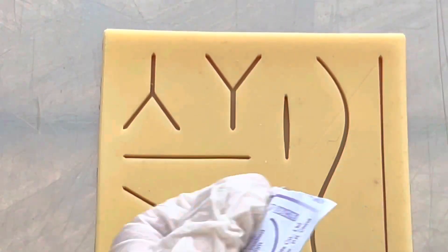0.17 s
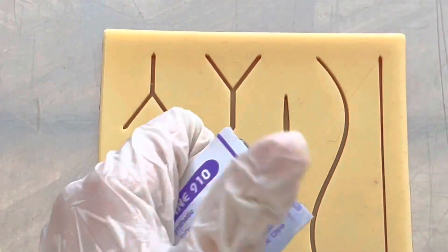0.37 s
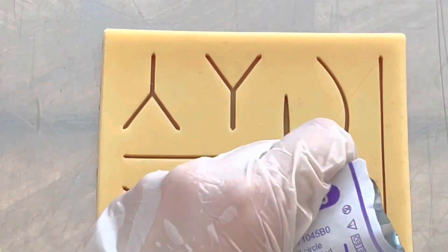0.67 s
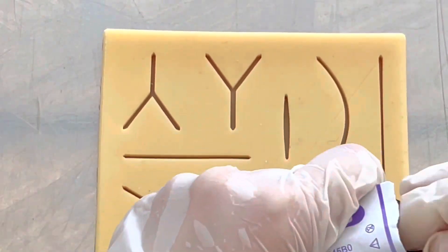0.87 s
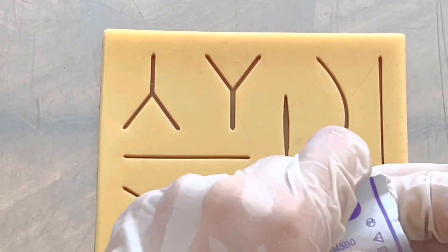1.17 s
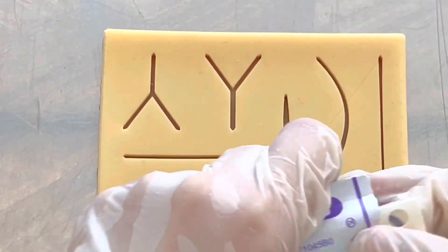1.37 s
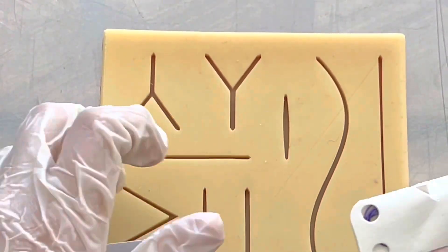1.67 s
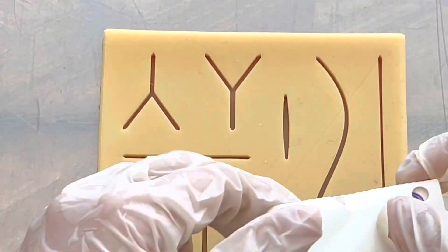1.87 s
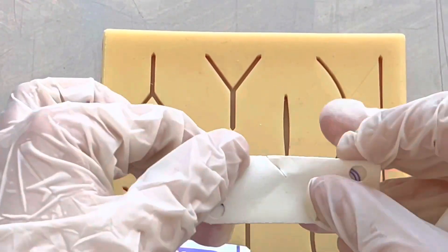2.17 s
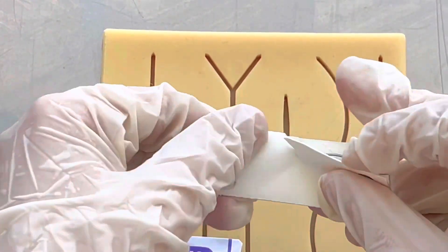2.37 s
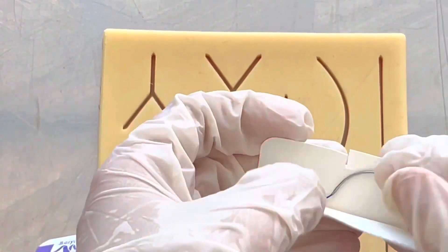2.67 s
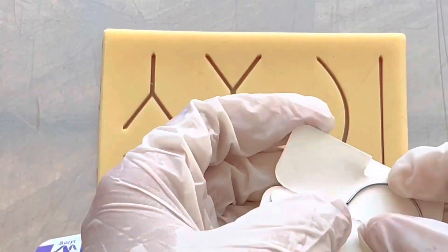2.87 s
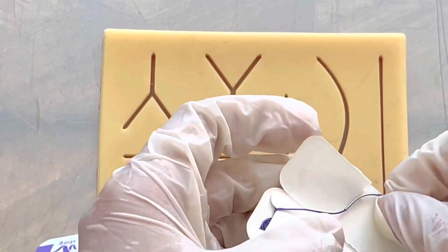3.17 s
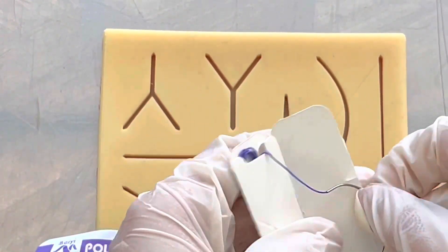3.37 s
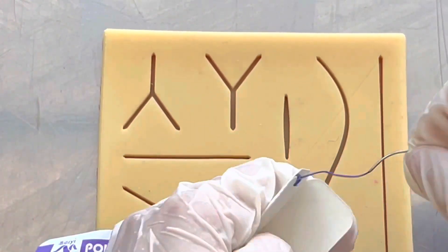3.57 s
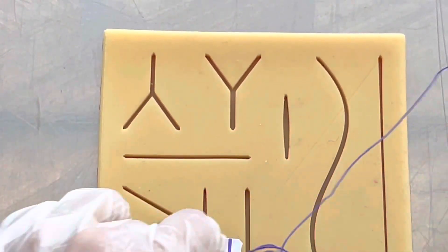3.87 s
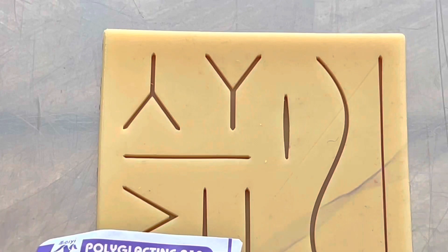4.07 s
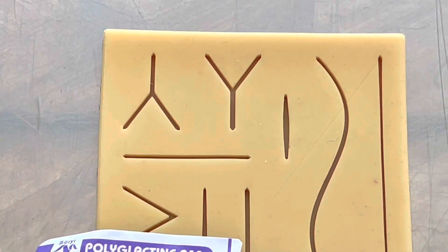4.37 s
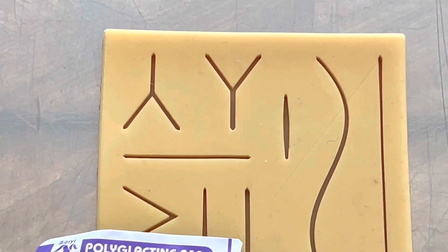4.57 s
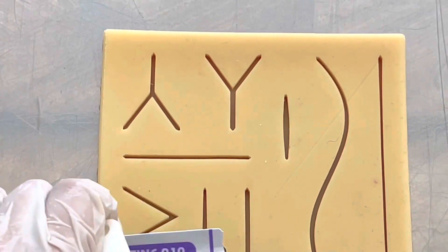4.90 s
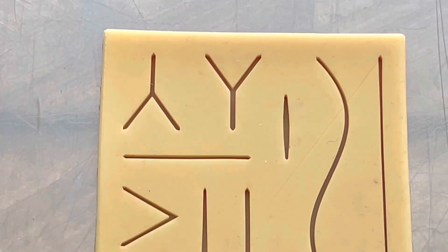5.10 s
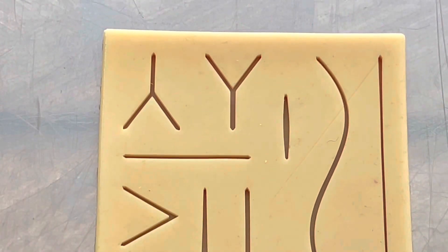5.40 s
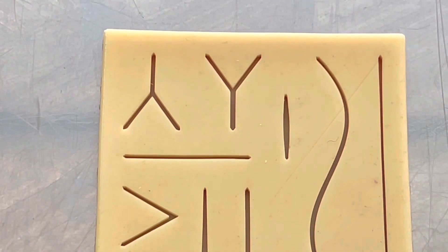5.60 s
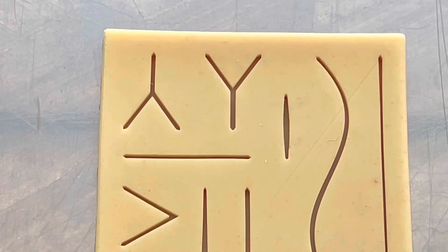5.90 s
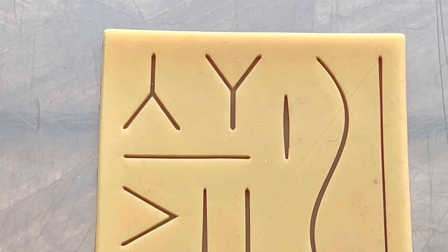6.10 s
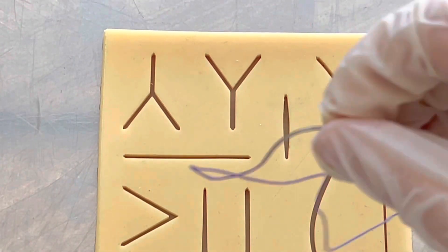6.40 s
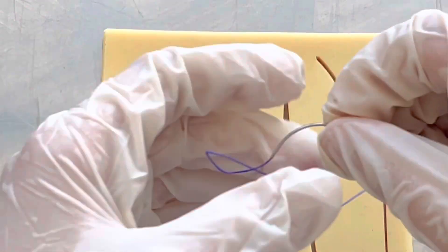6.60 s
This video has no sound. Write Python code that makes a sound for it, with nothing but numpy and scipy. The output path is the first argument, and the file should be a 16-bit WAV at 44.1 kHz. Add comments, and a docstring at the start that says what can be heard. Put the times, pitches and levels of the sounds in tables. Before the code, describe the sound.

A close stereo pickup in a small room with a low rush of air and faint, wavering machine hum. At once, foil tears in a dense crackly burst until about 0.15 s, then soft glove rustle. Crisp ringing snaps return around 0.6-0.75 s, with the sharpest near 1.0 s and another at 1.35 s beside short rubs. Lighter ticks lead to stiff card popping strongly at 2.12-2.27 s, with a dull soft bump. From 2.4 to 3.4 s there is mostly quiet rustling and small clicks. Between 3.4 and 4.25 s, quick dry rubs and swishes accompany the thread being drawn out. A brief lull near 4.7 s gives way to wrapper crinkles at 4.8-5.4 s, then a rough scraping skid peaking at 5.64 s and dulling away by about 6 s, with low soft bumps. Near quiet follows, then faint glove rustle around 6.4 s and a last soft bump near 6.7 s.

```python
"""Opening a foil suture packet

Gloved hands tear open a foil packet above a table, unfold the card inside and draw out the thread.
Stiff foil and card buckle in short ringing snaps, over stick-slip rubs and soft glove rustle (shaped noise);
the empty wrapper then slides away in three pushes, and the table answers soft bumps with low decaying sines.
A small room adds a noisy tail, moving air and machine hum; two closely spaced microphone ports pick it up."""
import sys
import numpy as np
from scipy import signal
from scipy.fft import rfft, irfft, next_fast_len
from scipy.io import wavfile
from scipy.ndimage import uniform_filter1d

SR = 44100
rng = np.random.default_rng(int(sys.argv[2]) if len(sys.argv) > 2 else 0)


def wrap_up_sound(samples):
    """Save the sound to the file named by the first command line argument, as 16-bit audio."""
    columns = np.atleast_2d(samples).T
    # keep every value between -1 and 1, then stretch to whole-number steps
    tamed = np.clip(columns, -1, 1)
    steps = np.round(tamed * 32767).astype(np.int16)
    wavfile.write(sys.argv[1], SR, steps)


N = 297479
SIZE = next_fast_len(N + 2048, True)
FREQS = np.fft.rfftfreq(SIZE, 1 / SR)
TIME = np.arange(N) / SR


def amp(db):
    """Decibels to gain."""
    return 10 ** (np.asarray(db) / 20)


def unit(x):
    """Scales to an rms of 1."""
    return x / np.sqrt(np.mean(x ** 2) + 1e-20)


def read(points, hz):
    """Reads a table on a log-frequency axis."""
    f, value = np.transpose(points)
    return np.interp(np.log(hz + 1), np.log(np.abs(f) + 1), value)


def add(mix, s, sound):
    """Adds a sound into the mix at a time in seconds."""
    part = mix[..., max(round(s * SR), 0):][..., :sound.shape[-1]]
    part += sound[..., :part.shape[-1]]


def filtered(x, gain):
    """Filters a full-length signal by a gain curve over FREQS."""
    return irfft(rfft(x, SIZE) * gain, SIZE)[..., :N]


def colour(x, db):
    """Filters a full-length signal by a dB curve over FREQS."""
    return filtered(x, amp(db))


def low_pass(x, hz):
    """Keeps what lies below a frequency."""
    return filtered(x, 1 / (1 + (FREQS / hz) ** 4))


def causal(gain, size=2048):
    """Minimum-phase impulse response: the quickest one with this magnitude."""
    log_gain = np.log(np.maximum(np.r_[gain, gain[-2:0:-1]], 1e-5))
    return np.fft.ifft(np.exp(np.conj(signal.hilbert(log_gain)))).real[:size]


def wander(rate_hz):
    """Slow random drift with an rms of 1."""
    return unit(low_pass(rng.standard_normal(N), rate_hz))


# likeness of diffuse sound at the two ports: [f/Hz, correlation]
PORT_CORRELATION = [(40, 0.96), (200, 0.85), (400, 0.46), (650, 0.088), (1000, 0.37), (1450, -0.54),
                    (1850, 0.65), (2300, 0.97), (4800, 1), (6000, 0.74), (8400, 1), (15000, 0.91)]


def diffuse(pair):
    """Makes two unrelated signals as alike as diffuse sound is at the ports."""
    c = np.clip(read(PORT_CORRELATION, FREQS), -1, 1)
    mid, side = filtered(pair, np.sqrt(np.array([1 + c, 1 - c]) / 2))
    return np.array([mid + side, mid - side])


def friction(slips_per_s, spread_db, hiss, uneven_db):
    """Tiny slips at random moments, each of random size and about a millisecond of noise, over a smooth hiss."""
    decay_s = 0.00081
    sizes = amp(spread_db * np.minimum(rng.exponential(1, N), 3.5))
    slips = (rng.random(N) < slips_per_s / SR) * sizes
    power = signal.lfilter([1], [1, -np.exp(-1 / (decay_s * SR))], slips ** 2)
    envelope = np.sqrt(power / power.mean() + hiss) * amp(uneven_db * wander(57))
    return unit(rng.standard_normal((2, N)) * envelope)


def patchy(x, depth_db, patch_s, patch_hz):
    """The contact point keeps moving, so different parts of the sheet sound from moment to moment."""
    hz, t, z = signal.stft(x, SR, nperseg=512, noverlap=384)
    across = np.fft.fftfreq(len(hz), hz[1])[:, None] * patch_hz
    along = np.fft.fftfreq(len(t), t[1]) * patch_s
    spectrum = np.fft.fft2(rng.standard_normal(z.shape[1:]))
    field = unit(np.fft.ifft2(spectrum * np.exp(-2 * (across ** 2 + along ** 2))).real)
    z = z * amp(depth_db * np.clip(field, -2, 2))
    return unit(signal.istft(z, SR, nperseg=512, noverlap=384)[1][:, :N])


def snap(ring_hz, ring_db, ring_width_hz, body_hz, body_db, treble_db):
    """A facet flips over in about two milliseconds; it and the sheet around it ring for a few cycles."""
    rise_s, evenness = 0.00041, 0.63  # evenness: how far the burst's spectrum is flattened, 0 to 1
    skirt_hz, body_width_hz = 1700, 650
    hz, t = np.fft.rfftfreq(2048, 1 / SR), np.arange(2048) / SR
    flip = rfft(rng.standard_normal(len(t)) * (t / rise_s) ** 2 * np.exp(-t / rise_s))
    flip /= np.sqrt(uniform_filter1d(abs(flip) ** 2, size=25)) ** evenness
    sheet_db = read([(150, body_db - 22.5), (600, body_db - 6.5), (1700, body_db), (2500, -0.88), (5800, -1.3),
                     (8000, treble_db - 0.5), (12000, treble_db), (16000, treble_db - 14.5)], hz)
    ring = amp(ring_db + 4.0) / np.hypot(1, 2 * (hz - ring_hz) / ring_width_hz)
    ring *= np.exp(-((hz - ring_hz) / skirt_hz) ** 2)
    body = amp(body_db + 5.0) / (1 + (2 * (hz - body_hz) / body_width_hz) ** 2)
    sound = rfft(causal(np.sqrt(amp(sheet_db) ** 2 + ring ** 2 + body ** 2))) * flip
    core = (hz > 2000) & (hz < 6000)  # band that sets the strength
    return irfft(sound / np.sqrt(np.mean(abs(sound[core]) ** 2)))[:len(t) // 2]


def creases(per_s, spread_db, count=10):
    """Small creases give way at random moments, each ticking at one of ten pitches."""
    sizes = (rng.random(N) < per_s / SR) * amp(spread_db * np.minimum(rng.exponential(1, N), 3))
    crease, ticks = rng.integers(0, count, N), np.zeros(N)
    for k, hz in enumerate(np.geomspace(2200, 6500, count)):
        tick = snap(hz, ring_db=10, ring_width_hz=900, body_hz=1300, body_db=-12, treble_db=-9)
        for at in np.flatnonzero(sizes * (crease == k)):
            add(ticks, at / SR, sizes[at] * tick)
    return unit(ticks)


# colour of the moving air: [f/Hz, relative level/dB]
AIR_COLOUR = [(20, -49.5), (28, -19.5), (36, 1), (60, 1.5), (95, -5.5), (140, 0.5), (220, -14),
              (350, -10.5), (500, -13.5), (750, -28.5), (1100, -33.5), (1600, -31.5), (2200, -40.5),
              (2750, -24.5), (3400, -54.5), (16000, -48)]
# steady lines of the machine: [f/Hz, relative level/dB]
HUM_LINES = [(37.7, -61.5), (123.8, -64.5), (150.7, -62), (188.4, -62.5), (226.1, -70.5), (263.8, -63.5),
             (301.5, -66), (339.1, -71), (414.5, -71.5), (468.3, -72.5), (490.3, -70), (619.1, -77.5)]


def background(air_db=-52, hum_db=-1, waver_rad=0.5):
    """Low rush of moving air and the wavering lines of a machine."""
    air = unit(colour(diffuse(rng.standard_normal((2, N))), read(AIR_COLOUR, FREQS)))
    hum = np.zeros(N)
    for hz, db in HUM_LINES:
        phase = 2 * np.pi * (hz * TIME + rng.random()) + waver_rad * wander(6.0)
        hum += amp(db) * np.sqrt(2) * np.sin(phase)
    return amp(air_db) * air + amp(hum_db) * hum


# room decay: [f/Hz, t60/s]
ROOM_DECAY = [(300, 0.64), (1600, 0.41), (4000, 0.51), (8000, 0.27), (15000, 0.31)]
# colour of the room's answer: [f/Hz, gain/dB]
ROOM_GAIN = [(200, 12.5), (600, 2.5), (1100, 3.5), (1700, 6), (2800, -4), (4200, -4.5), (7000, -2),
             (14000, -3)]


def room(x, build_s=0.001):
    """A noisy tail that decays at its own rate in each band, fastest in the treble."""
    hz, t, z = signal.stft(rng.standard_normal((2, SR * 3 // 4)), SR, nperseg=256)
    tail = signal.istft(z * amp(-60 * t / read(ROOM_DECAY, hz)[:, None]), SR, nperseg=256)[1]
    tail = tail * (1 - np.exp(-(np.arange(tail.shape[1]) / SR / build_s) ** 2))
    wet = signal.fftconvolve(x[None], tail / np.linalg.norm(tail[0]), axes=1)[:, :N]
    return diffuse(colour(wet, read(ROOM_GAIN, FREQS)))


# soft bumps of the hands on the table: [t/s, level/dB, f/Hz]
TABLE_BUMPS = [(2.276, -39, 62), (5.544, -44.5, 86), (5.641, -43, 64), (5.968, -39.5, 59),
               (6.689, -43.5, 170)]


def bumps(swell_s=0.013):
    """The table answers each soft push with a few low cycles."""
    out, t = np.zeros(N), np.arange(SR // 4) / SR
    for s, db, hz in TABLE_BUMPS:
        swell = t / swell_s * np.exp(1 - t / swell_s)
        add(out, s, amp(db) * swell * np.sin(2 * np.pi * hz * t))
    return out


# steady rustle, hushed when the hands rest: [t/s, level/dB]
HANDLING_LEVEL = [(0, -75), (0.45, -68.5), (0.72, -64), (1.08, -63.5), (1.33, -66.5), (1.85, -70),
                  (2.4, -60.5), (2.7, -67), (3.3, -63.5), (3.9, -66), (4.43, -69.5), (4.68, -80.5),
                  (4.84, -62), (5.4, -62), (6.1, -72), (6.22, -92.5), (6.47, -71.5), (6.75, -80.5)]
# separate rustles as the fingers shift their grip: [peak t/s, length/s, level/dB]
GRIP_CHANGES = [(0.01, 0.082, -50.5), (0.291, 0.18, -60.5), (0.518, 0.067, -59.5), (1.501, 0.08, -56.5),
                (1.944, 0.1, -56), (2.53, 0.11, -59.5), (2.841, 0.037, -60), (2.94, 0.047, -60.5),
                (3.095, 0.15, -61), (3.626, 0.098, -59), (4.328, 0.046, -62.5), (4.58, 0.049, -63),
                (4.927, .06, -61), (5.056, 0.062, -52.5), (5.21, .1, -60), (6.387, 0.096, -66.5)]
REGRIP_EDGE_DB = -8.5  # either end of a rustle, re its middle


def hand_motion():
    """Gain of the glove rustle: steady handling, plus a bell-shaped swell for each change of grip."""
    power = amp(np.interp(TIME, *np.transpose(HANDLING_LEVEL))) ** 2
    for s, length_s, db in GRIP_CHANGES:
        near = abs(TIME - s) < 2 * length_s
        power[near] += amp(db + REGRIP_EDGE_DB * (2 * (TIME[near] - s) / length_s) ** 2) ** 2
    return np.sqrt(power)


# colour of the glove rustle: [f/Hz, gain/dB]
GLOVE_GAIN = [(200, -35), (700, -16), (1100, -2), (1900, 4.5), (3000, -0.5), (4200, 2.5), (7000, -1.5),
              (10000, -2.5), (13500, -10.5), (16000, -25)]


def gloves(crinkle_db=-9):
    """Soft friction noise that follows the hands, with small creases ticking in it."""
    slips = friction(slips_per_s=270, spread_db=-0.5, hiss=2.5, uneven_db=1.7)
    rustle = colour(diffuse(slips), read(GLOVE_GAIN, FREQS))
    rustle = patchy(rustle, depth_db=2.2, patch_s=0.03, patch_hz=700)
    return (rustle + amp(crinkle_db) * creases(per_s=70, spread_db=1.5)) * hand_motion()


# pushes that send the wrapper over the table: [fastest t/s, relative level/dB]
WRAPPER_PUSHES = [(5.41, -62), (5.499, -50.5), (5.641, -34.5)]
PUSH_RISE_DB_PER_S, SKID_FALL_DB_PER_S, SKID_DULLING_DB_PER_S = 205, 75, 72


def skid(fall_db_per_s):
    """Gain of the sliding: each push builds quickly, then friction brakes it."""
    swells = [db - np.maximum(PUSH_RISE_DB_PER_S * (s - TIME), fall_db_per_s * (TIME - s))
              for s, db in WRAPPER_PUSHES]
    return amp(np.max(swells, axis=0))


# colour of the sliding wrapper: [f/Hz, gain/dB]
SLIDE_GAIN = [(100, -6.5), (250, -3.5), (500, 7), (700, 5), (1000, 7), (1300, 5), (1650, 6.5), (2300, 2.5),
              (2700, -1), (4500, -3), (7000, -8), (10000, -9), (13500, -15.5), (16000, -48)]


def slide(level_db=2.0, crinkle_db=-14, bright_db=7, split_hz=4000):
    """The wrapper skids and crinkles over the table, duller as it slows."""
    slips = friction(slips_per_s=830, spread_db=4.5, hiss=2.8, uneven_db=1.25)
    grain = colour(diffuse(slips), read(SLIDE_GAIN, FREQS))
    grain = patchy(grain, depth_db=3, patch_s=0.06, patch_hz=140)
    grain = grain + amp(crinkle_db) * creases(per_s=260, spread_db=2.5)
    low = low_pass(grain, split_hz)
    treble = amp(bright_db) * (grain - low)
    treble_skid = skid(SKID_FALL_DB_PER_S + SKID_DULLING_DB_PER_S)
    return amp(level_db) * (low * skid(SKID_FALL_DB_PER_S) + treble * treble_skid)


# colour of rubbed foil, card and thread: [f/Hz, gain/dB]
RUB_GAIN = [(60, -28), (200, -11), (600, -5.5), (1100, -6.5), (1900, 2), (3000, -1), (4200, 1.5), (7000, 4),
            (9500, 5), (13000, -0.5), (16000, -12)]
# tearing and quick rubs of foil, card and thread:
# [start t/s, end t/s, relative level/dB, body/dB, sheet ring f/Hz, ring/dB]
RUB_STROKES = [(0.021, 0.121, -39.5, 4.5, 2360, 2), (0.723, 0.74, -47, 9, 2600, -3),
               (0.836, 0.851, -62, 11, 2680, 29), (1.324, 1.397, -51, 18, 3300, -6),
               (1.394, 1.465, -52.5, 17.5, 745, 14), (1.407, 1.445, -63, 0, 2200, 19),
               (2.25, 2.343, -50.5, -1, 5800, 12), (2.994, 3.134, -63.5, 17, 3350, 14),
               (3.277, 3.293, -55, 5, 4000, -16), (3.307, 3.346, -51.5, 10, 6200, 1),
               (3.39, 3.411, -49, 12.5, 3020, 2), (3.52, 3.558, -46.5, 7, 2400, -8),
               (3.694, 3.875, -50.5, -36, 4180, -1), (3.876, 3.964, -51, -13, 2580, 0.5),
               (4.001, 4.067, -44.5, 8, 4000, -32), (4.082, 4.159, -48, -8, 4300, -9),
               (4.18, 4.249, -51, -28, 5940, 1), (4.873, 4.906, -46.5, 18, 3600, 11),
               (5.011, 5.062, -52.5, 15, 2200, 12.5), (5.171, 5.268, -61.5, 21, 1720, 17),
               (5.295, 5.347, -55, 16.5, 1660, 16), (5.336, 5.371, -43, 15, 1550, 18),
               (5.36, 5.392, -55, -1, 2620, 26.5), (5.51, 5.53, -45.5, 3, 1750, 15.5)]


def rubs(level_db=-1.2, crinkle_db=-6, body_hz=1300, ring_width_hz=380, taper=0.45):
    """Short strokes of dense stick and slip with crisp ticks; body and sheet ring are set per stroke."""
    slips = friction(slips_per_s=660, spread_db=4.0, hiss=0.68, uneven_db=1.5)
    grain = colour(diffuse(slips), read(RUB_GAIN, FREQS))
    grain = patchy(grain, depth_db=2.5, patch_s=0.012, patch_hz=700)
    grain = grain + amp(crinkle_db) * creases(per_s=170, spread_db=4)
    body = low_pass(grain, body_hz)
    out = np.zeros((2, N))
    for start, end, db, body_db, ring_hz, ring_db in RUB_STROKES:
        span = slice(max(round(start * SR), 0), round(end * SR))
        ring = signal.lfilter(*signal.iirpeak(ring_hz, ring_hz / ring_width_hz, SR), grain[:, span])
        stroke = grain[:, span] + (amp(body_db) - 1) * body[:, span] + amp(ring_db) * ring
        add(out, start, amp(db + level_db) * stroke * signal.windows.tukey(stroke.shape[1], taper))
    return out


# buckling snaps: [t/s, strength/dB, facet ring f/Hz, relative ring height/dB,
# sheet body f/Hz, relative body/dB, relative treble/dB]
BUCKLING_SNAPS = [(0.0037, -3, 3360, -1, 700, -5.5, -7), (0.032, -9, 3220, 9, 1640, -12, -2),
                  (0.0643, -13, 6030, -1, 1490, -13, 3), (0.081, -6.5, 7150, -10, 1700, -11, -1),
                  (0.106, -6, 3180, 13, 1480, 5, -4), (0.16, -15.5, 2360, 16, 1250, -14, -15),
                  (0.3404, -17, 2470, 14, 1140, 2, -33), (0.503, -22, 5900, -1, 1300, -13, -4.5),
                  (0.584, -3, 2190, 6.5, 1550, -18, -12.5), (0.6474, -10.5, 3300, 10, 1500, -1, -7.5),
                  (0.6557, -10, 2270, 16, 1680, -12, -9), (0.7233, 6, 2660, 5.5, 1560, -20, -9),
                  (0.993, -20, 6500, -2, 1610, 5.5, -19), (0.9992, 8, 3730, 10.5, 1450, 7, -14),
                  (1.1387, -11, 5740, -4, 1350, -2, -12), (1.255, -19.5, 2180, 5, 1090, -2, -20),
                  (1.343, -0.5, 3300, 3.5, 1760, -3.5, -5), (1.446, -18.5, 5000, -9, 800, -4, -7),
                  (1.5298, -19.5, 2440, 14, 1280, -6, -19), (1.7478, -24.5, 3720, 8, 1320, 8.5, -4),
                  (1.85, -18, 3360, 12, 1340, -4, -22), (1.8987, -6.5, 6430, 2.5, 900, -17, -4),
                  (2.1256, -5, 4540, 6.5, 1920, -8, -5), (2.2173, -6.5, 3230, 6, 1790, -4, -18),
                  (2.2499, 3, 3850, 2, 766, 1, -11), (2.2692, 8, 4270, 6, 1450, -9, -5.5),
                  (2.5756, -17.5, 4000, -8, 1770, -7, -2), (3.004, -22.5, 2040, 5, 1320, -1, -5),
                  (3.3851, -21, 2830, 5, 1280, -2, -7), (3.399, -11.5, 6250, 2, 1620, -6.5, -4.5),
                  (3.49, -16, 3530, 19, 1370, -14, -27), (3.831, -13, 4100, -11, 1080, -28, -11),
                  (4.0962, -20, 5500, 0, 1200, -10, -3), (4.128, -19.5, 4270, 3, 1200, -15, 3),
                  (4.2318, -16.5, 5880, 8, 950, -23, 2), (4.264, -18.5, 4600, 7, 750, -24, 0),
                  (4.8194, -10.5, 3840, 9, 1230, -15, -10), (4.8865, -6.5, 3430, -1, 1530, -14, -28),
                  (4.9562, -11, 3790, -8, 1500, -15, -16), (5.0302, -11, 2060, 2, 1600, -21, -20),
                  (5.198, -5.5, 5230, 2, 1660, -4, -0.5), (5.301, -25, 1780, 2, 1600, -2, 9),
                  (5.3747, -5.5, 2660, 11, 1550, -7, -6), (6.004, -23.5, 4530, 8.5, 1240, 0, 0)]
RING_WIDTH_HZ = 740  # typical width of a facet's ring


def snaps():
    """All snaps as they radiate in one direction."""
    out = np.zeros(N)
    for s, db, ring_hz, ring_db, *sheet in BUCKLING_SNAPS:
        add(out, s, amp(db) * snap(ring_hz, ring_db, RING_WIDTH_HZ, *sheet))
    return out


# first reflections from table and hands: [delay t/s, level/dB]
FIRST_ECHOES = [(.0019, -12), (.0037, -18), (.0063, -23.5), (.0074, -19.5), (0.0128, -19.5),
                (0.0153, -19.5)]
# share of a snap scattered off the hands to the ports unequally: [f/Hz, level/dB]
HAND_SCATTER = [(300, -18), (1400, -8), (2300, -13.5), (4200, -13.5), (6500, -24), (10000, -2),
                (13000, -11)]


def crackle(room_db=-11):
    """Snaps arrive straight, then off table and hands, then from the whole room."""
    near, sideways, upward = snaps(), snaps(), snaps()
    for delay_s, db in FIRST_ECHOES:
        add(near, delay_s, amp(db) * sideways)
    side = colour(sideways, read(HAND_SCATTER, FREQS))
    wet = (room(sideways) + room(upward)) / np.sqrt(2)
    return np.array([near + side, near - side]) + amp(room_db) * wet


# where the rubbing happens: [t/s, left minus right level/dB]
RUB_POSITION = [(0, -1.5), (2.5, 1.5), (4.9, -0.5), (5.2, 0), (5.37, -1), (5.55, 0), (5.7, -.5),
                (6.1, -2.5)]


def scene():
    """Everything the hands do, in the room."""
    pan_db = np.interp(TIME, *np.transpose(RUB_POSITION))
    rubbing = (rubs() + slide()) * amp(np.array([pan_db, -pan_db]) / 2)
    rubbing_room = amp(-8) * room(rubbing.mean(0))
    return background() + bumps() + gloves() + rubbing + rubbing_room + crackle()


# phase between the ports: [f/Hz, phase/rad]
PORT_PHASE_RAD = [(0, 0), (5000, 0), (7200, -1.3), (8100, -3.0), (8900, -3.3), (11200, -6.2), (13000, -6.4),
                  (14600, -9.2), (16500, -9.5)]
EDGE_HZ = 16500


def record(dry):
    """The ports turn the treble against each other; then the band limit."""
    phase = np.interp(FREQS, *np.transpose(PORT_PHASE_RAD))
    pair = filtered(dry, np.exp(.5j * np.array([phase, -phase])))
    band_limit = signal.firwin(255, EDGE_HZ, window=("kaiser", 9), fs=SR)
    return signal.oaconvolve(pair, band_limit[None], "same")


dry = scene()
out = record(dry)
wrap_up_sound(out)
```